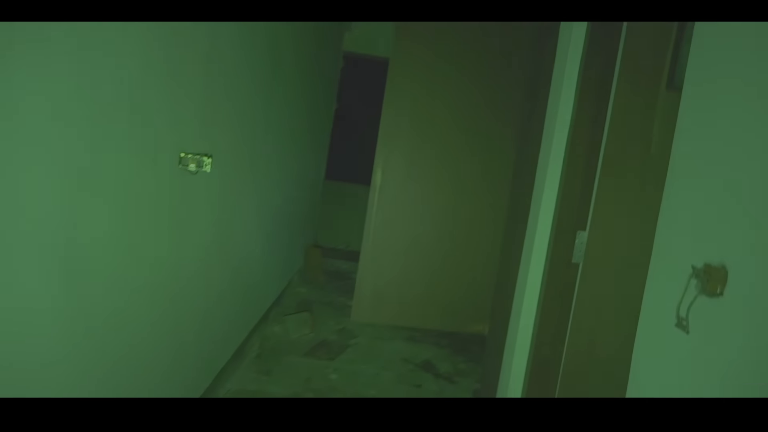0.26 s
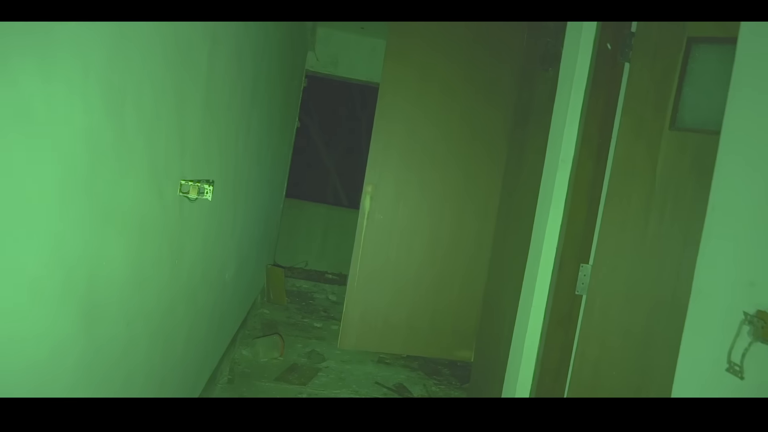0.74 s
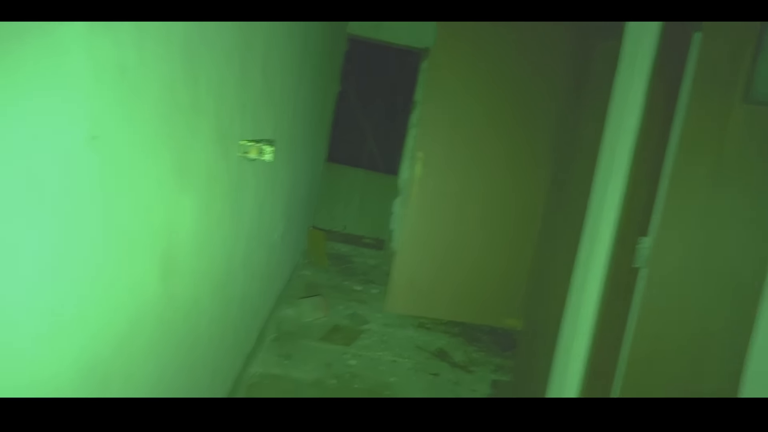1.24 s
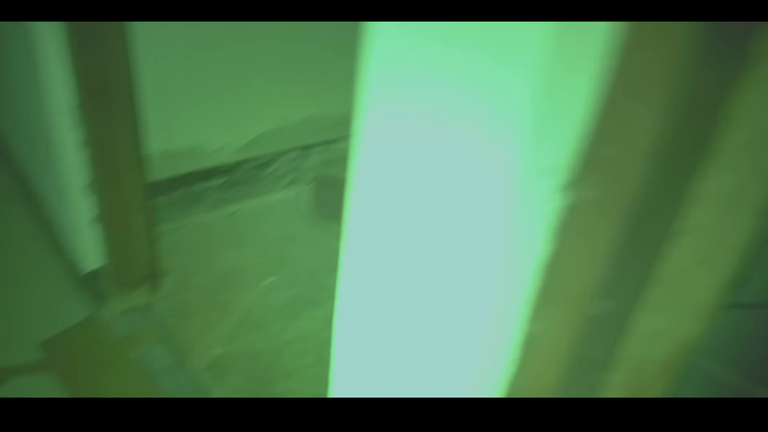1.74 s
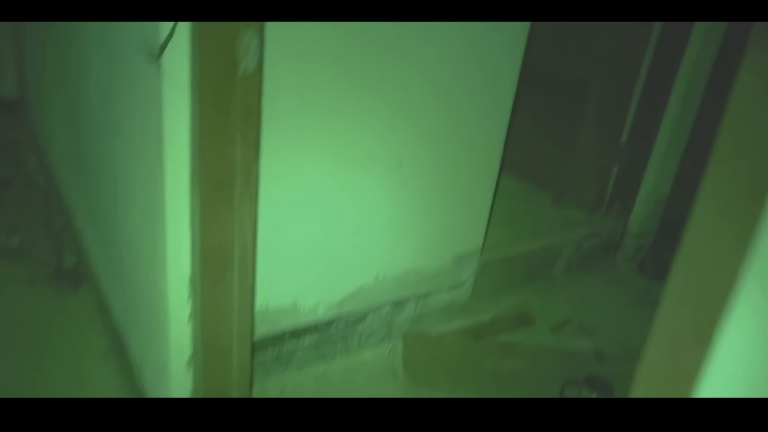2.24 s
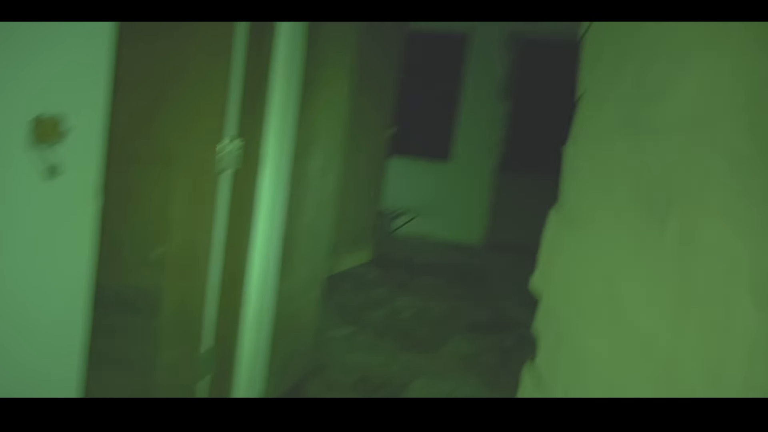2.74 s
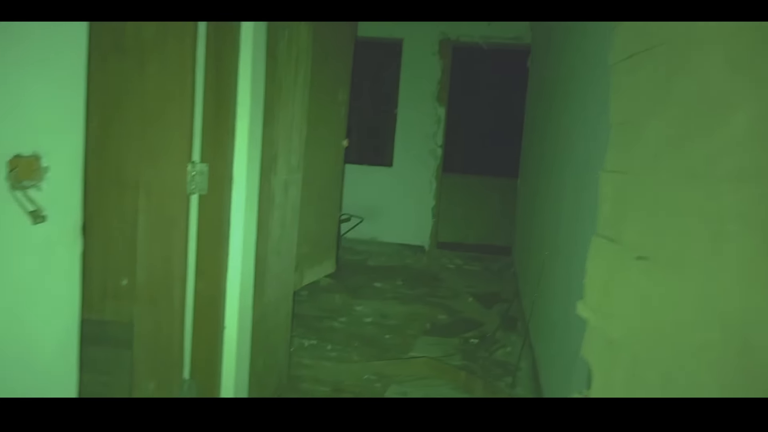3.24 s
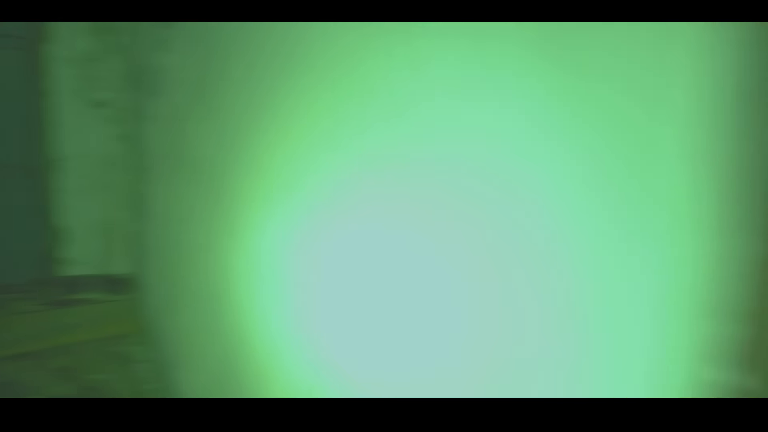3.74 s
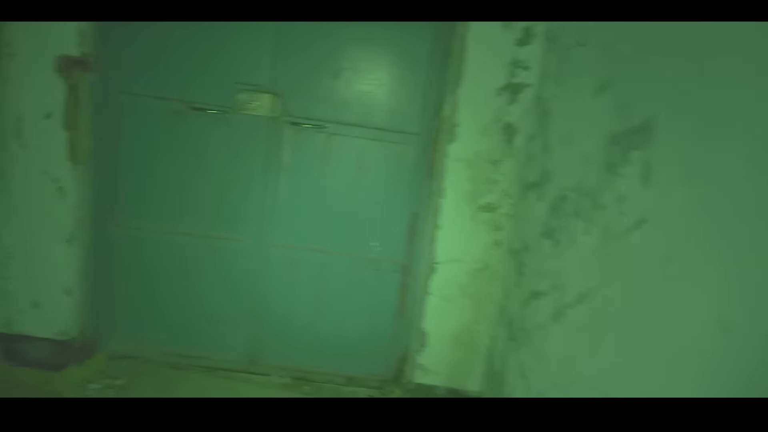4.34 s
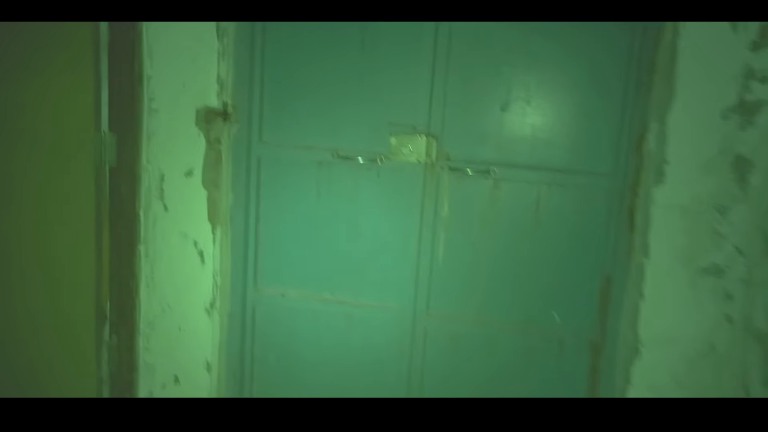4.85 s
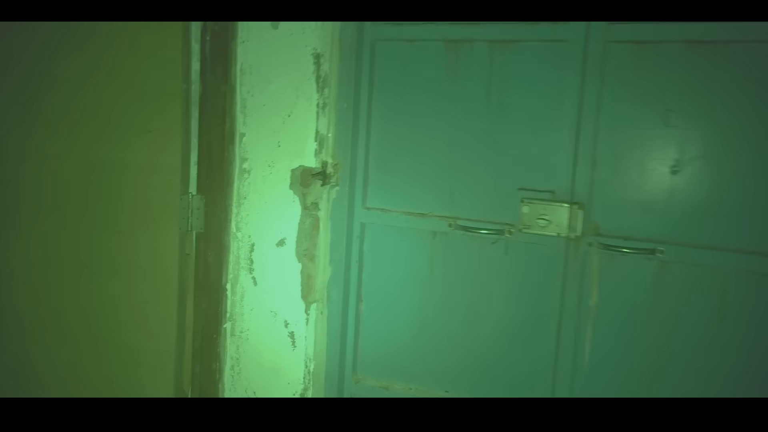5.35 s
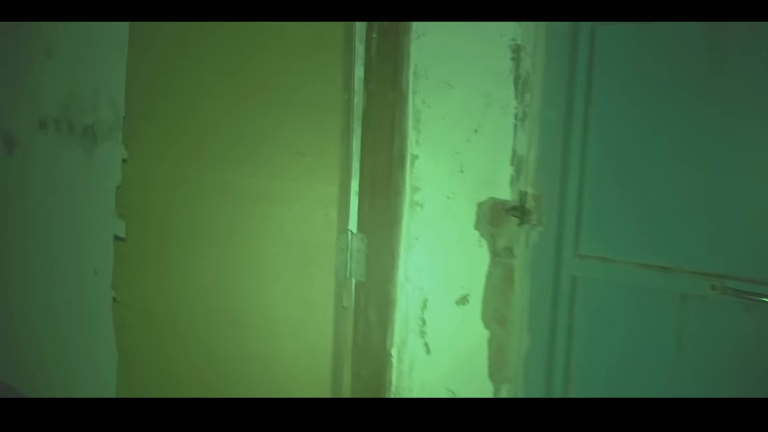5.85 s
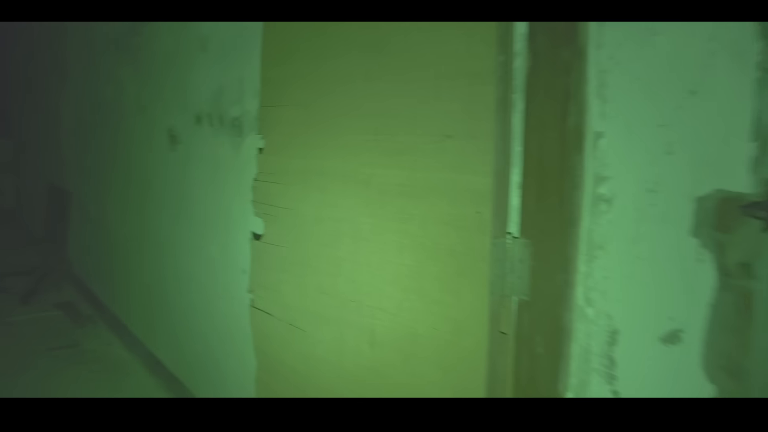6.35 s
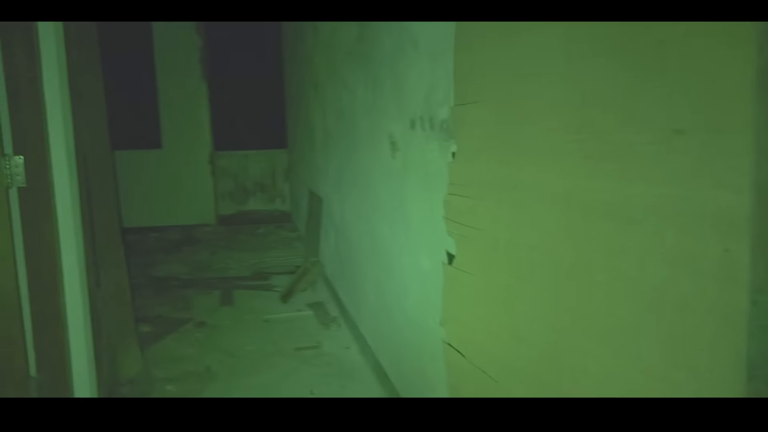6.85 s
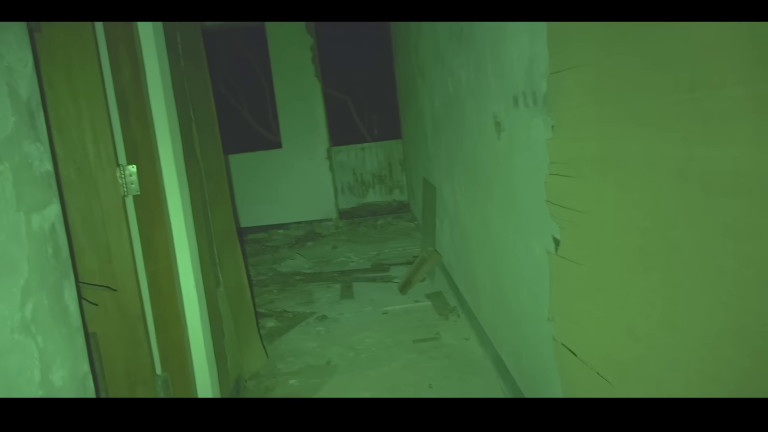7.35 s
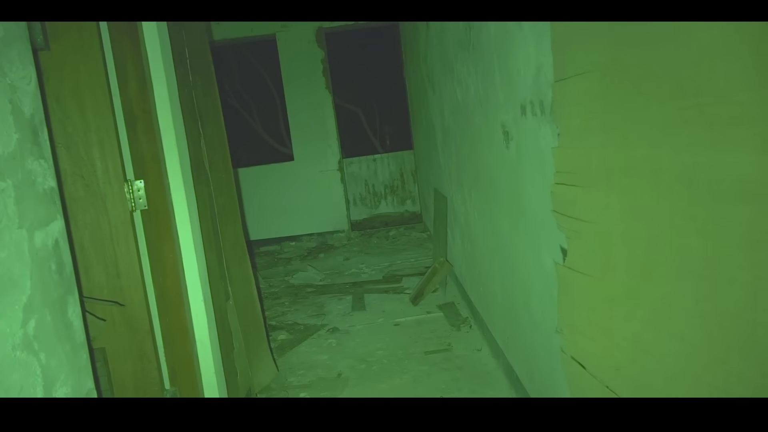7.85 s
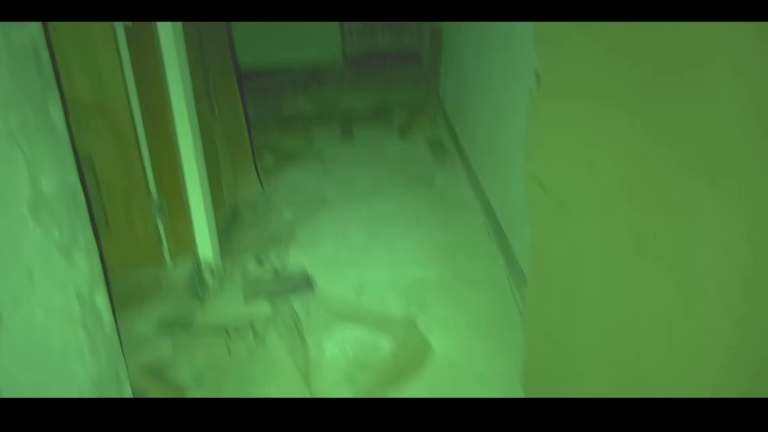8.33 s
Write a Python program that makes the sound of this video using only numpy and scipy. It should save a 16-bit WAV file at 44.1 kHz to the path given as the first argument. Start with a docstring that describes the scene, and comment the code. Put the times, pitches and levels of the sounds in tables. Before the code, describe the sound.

Someone steps slowly over broken plaster in bare, echoing rooms. Quiet scuffing comes first, then a dense run of brittle snaps and grinding grit with one very loud crack, then scattered lighter crunches. Night insects trill high and thin throughout, over low rumble and hiss, and soft low knocks shake the hand-held camera.

```python
"""Steps over rubble in an empty building

Slow steps cross plaster rubble and grit in an empty concrete building at night, heard from a hand-held camera.
Chips snap as short band-limited noise bursts, grit grinds as random grains, and the bare rooms echo both.
Dull jolts ring the camera body as damped modes, over low drones, air, hiss and a low tremble of the hand.
A high whine, most likely night insects, comes through the open windows as narrow bands of noise."""
import sys
import numpy as np
from scipy import signal
from scipy.fft import rfft, irfft, next_fast_len
from scipy.io import wavfile
from scipy.ndimage import uniform_filter1d

SR = 44100
rng = np.random.default_rng(int(sys.argv[2]) if len(sys.argv) > 2 else 0)


def log_audio(samples):
    """Write samples as a 16-bit WAV file to the path given in sys.argv[1]."""
    # one column per channel
    frames = np.atleast_2d(samples).T
    # limit to full scale, then quantise
    limited = np.clip(frames, -1, 1)
    pcm = np.round(limited * 32767).astype(np.int16)
    wavfile.write(sys.argv[1], SR, pcm)


N = 378827
T = np.arange(N) / SR

# a sole grinds or slides on grit: [t/s of greatest pressure, time scale of the rise t/s,
# level/dB before the mix, upper edge f/Hz]
GRINDS = [(0.362, 0.1, -58, 3500), (1.529, 0.13, -61, 2040), (1.95, 0.2, -62, 1900),
          (2.541, .25, -50, 1800), (2.69, 0.12, -43, 5000), (3.109, 0.059, -56.5, 2130),
          (3.499, .17, -63.5, 2192), (3.828, 0.038, -40, 4625), (3.931, 0.073, -39.5, 7800),
          (4.029, 0.043, -38.5, 6350), (4.289, 0.088, -50.5, 4280), (4.73, .014, -34.5, 4760),
          (4.808, .04, -32, 5960), (4.924, .044, -33, 5030), (5.047, 0.03, -34, 4800),
          (5.538, 0.017, -30, 5600), (5.589, 0.043, -41, 6670), (5.741, .058, -37.5, 6030),
          (6.6, .13, -50, 1820), (6.701, 0.11, -47.5, 8300)]


def undb(db):
    """Decibels to amplitude ratio: 20 dB is a factor of ten."""
    return 10 ** (np.asarray(db) / 20)


def unit(x):
    """Normalisation to a root-mean-square of 1."""
    return x / np.sqrt(np.mean(x ** 2) + 1e-20)


def on_log(points, hz):
    """Linear interpolation of (f/Hz, value) points on a logarithmic frequency axis."""
    f, value = np.transpose(points)
    return np.interp(np.log(np.maximum(hz, 1)), np.log(f), value)


def colour(x, points):
    """Zero-phase filtering: the spectrum is multiplied by the gain of (f/Hz, gain/dB) points."""
    size = next_fast_len(x.shape[-1], True)
    gain = undb(on_log(points, np.fft.rfftfreq(size, 1 / SR)))
    return irfft(rfft(x, size) * gain, size)[..., :x.shape[-1]]


def band(x, lo_hz, hi_hz, order=2):
    """Causal Butterworth band-pass, kept valid by a least width and a limit below half the sample rate."""
    hi_hz = min(max(hi_hz, 1.15 * lo_hz), .47 * SR)
    return signal.lfilter(*signal.butter(order, [lo_hz, hi_hz], "bandpass", fs=SR), x)


def stereo(pair, width):
    """Middle-side stereo: left is middle plus side, right is middle minus side."""
    return pair[0] + colour(pair[1], width) * np.array([[1], [-1]])


def walk(rate):
    """Random modulation: independent levels, rate per second, joined by straight ramps; spread near 1."""
    k = int(SR / rate)
    held = np.repeat(rng.standard_normal(N // k + 1), k)
    return 1.2 * uniform_filter1d(held, k)[:N]


def add(out, s, x):
    """Superposition: mix a sound in at time s."""
    i = max(int(s * SR), 0)
    out[..., i:i + x.shape[-1]] += x[..., :max(N - i, 0)]


def swell(s, spread_s, db):
    """Gaussian envelope: a gain that rises and fades once."""
    return undb(db) * np.exp(-((T - s) / spread_s) ** 2 / 2)


def trill(hz, width_hz):
    """Random-phase synthesis: one pitch blurred into a Gaussian band of noise, as middle and side."""
    size = next_fast_len(N, True)
    f = np.fft.rfftfreq(size, 1 / SR)
    near = np.abs(f - hz) < 5 * width_hz
    phase = 2 * np.pi * rng.random((2, len(f)))
    spectrum = np.zeros((2, len(f)), np.complex64)
    spectrum[:, near] = np.exp(1j * phase[:, near] - ((f[near] - hz) / (2 * width_hz)) ** 2)
    return unit(irfft(spectrum)[:, :N])


def background(tremble_db=1.0, unsteady_db=2, sway_hz=22, hiss_db=-59.49, rise_s=0.064, settle_s=.14):
    """Stationary noise and slow motion: air, drones, hiss, and a hand tremble that jumps at each swing."""
    # low murmur of the building: [t/s, level/dB]
    murmur_levels = [(0, -56), (.9, -61.5), (1.7, -56.5), (6.5, -55), (7.8, -60), (8.59, -54.5)]
    # spectra of the air and of the microphone hiss: [f/Hz, gain/dB]
    air_spectrum = [(30, 3), (60, -12), (100, -4.5), (150, -1.5), (250, -5), (400, -7), (650, -12),
                    (950, -11), (1400, -17.5), (2500, -20.5), (6000, -35.5)]
    hiss_spectrum = [(100, -1), (2000, 1.5), (6000, 6.5), (9000, 0), (16000, -2)]
    # low drones that come and go as the camera moves:
    # [loudest t/s, Gaussian spread t/s, centre f/Hz, width f/Hz, level/dB]
    drone_table = [(1.62, 0.16, 55, 20, -59), (2.08, 0.07, 193, 13, -55.5), (3.45, 0.028, 159, 36, -56.5),
                   (4.27, 0.036, 121, 31, -53.5), (7.3, 0.67, 105, 12, -60.5), (7.7, 0.74, 151, 21, -65.5)]
    # quick swings of the hand-held camera: [t/s, rumble level/dB before the channel gains]
    swing_table = [(1.57, -40.5), (2.02, -50), (2.45, -56), (3.72, -40), (8.38, -44)]

    murmur_db = np.interp(T, *np.transpose(murmur_levels))
    air = unit(colour(rng.standard_normal((2, N)), air_spectrum)) * undb(murmur_db + 0.41 * walk(14))
    drones = sum(trill(hz, width_hz) * swell(s, spread_s, db) for s, spread_s, hz, width_hz, db in drone_table)
    hiss = unit(colour(rng.standard_normal((2, N)), hiss_spectrum)) * undb(hiss_db)

    swings = np.zeros(N)
    for s, db in swing_table:
        swings += undb(db) * np.exp(-np.maximum((s - T) / rise_s, (T - s) / settle_s))
    tremble = undb(murmur_db + tremble_db + unsteady_db * walk(7))
    phase = 2 * np.pi * np.cumsum(sway_hz * (1 + 0.202 * walk(22))) / SR
    sway = np.sin(phase) * (tremble + swings)

    side_gain = ((100, -8), (300, -4), (700, -9), (2000, -9))  # [f/Hz, gain/dB]
    return stereo(air + drones, side_gain) + hiss + sway * np.array([[1.7], [.9]])


def insects(throb_db=0.82, drift_db=1.0, flutter_db=2.0, surge_s=.48, crest_s=7.89):
    """Amplitude-modulated noise bands: choruses flicker separately but surge together; some voices swell."""
    # choruses and single singers by name: [centre f/Hz, width f/Hz]
    pitches = {"low": (3250, 130), "middle": (4600, 235), "upper": (5520, 220), "high": (6650, 220),
               "top": (7620, 220), "overtone": (9750, 450), "a": (4480, 80), "b": (4765, 35),
               "c": (5370, 35), "d": (5670, 12), "e": (5970, 25), "f": (6820, 40), "g": (7850, 100)}
    # common level curve, louder towards the open windows: [t/s, level/dB before each chorus's share]
    night_levels = [(0, 1), (.55, -2.5), (1.05, 2.9), (1.42, -2.5), (1.87, 1), (2.1, -10.5), (2.4, -0.5),
                    (3, -0.5), (3.55, 1.5), (3.9, -8), (5.95, -7), (6.3, -2), (7, -4.5), (8.59, -3.5)]
    # choruses: [pitch name, level/dB, share of the level curve, surge amplitude/dB]
    choruses = [("low", -54.5, 1.05, 1.5), ("middle", -68, 0.64, .3), ("top", -61, 0.23, .3),
                ("high", -67.5, .3, .3), ("upper", -70, .1, .3), ("overtone", -74, 0.97, .3)]
    # single singers and whole choruses that swell for a while:
    # [pitch name, loudest t/s, Gaussian spread t/s, level/dB]
    swelling_voices = [("middle", 1.4, 0.48, -63), ("middle", 5.1, 1.7, -61), ("a", 1.26, .06, -59.5),
                       ("a", 2.96, 0.5, -61.5), ("b", 1.75, 0.91, -64), ("b", 3.3, 0.31, -55.5),
                       ("b", 5.25, 0.7, -61), ("g", 1.38, 0.34, -57), ("f", 2.6, 1.6, -70),
                       ("g", 5.95, 0.29, -63), ("c", 7.05, 0.13, -63), ("upper", 7.7, .89, -64.5),
                       ("e", 7.75, 0.088, -61.5), ("d", 8.08, .11, -55.5), ("c", 8.5, 0.11, -63)]

    out = np.zeros((2, N))
    night_db = np.interp(T, *np.transpose(night_levels))
    surge = np.cos(2 * np.pi * (T - crest_s) / surge_s)
    for pitch, db, share, surge_db in choruses:
        unsteady_db = throb_db * walk(45) + drift_db * walk(5)
        out += trill(*pitches[pitch]) * undb(db + share * night_db + surge_db * surge + unsteady_db)
    for pitch, s, spread_s, db in swelling_voices:
        out += trill(*pitches[pitch]) * swell(s, spread_s, db + flutter_db * walk(14))
    side_gain = ((3200, -12), (4700, -12), (5600, -7), (7600, -8), (10000, -4))  # [f/Hz, gain/dB]
    return stereo(out, side_gain)


def jolts(push_s=0.0032, rattle_db=-13, detune=0.047, pan_db=-2.2):
    """Damped modes: soft blows ring the camera body, whose rocking sets the two microphones out of phase."""
    # jolts of heel and hand: [t/s, lowest mode level/dB, upper modes level/dB]
    blows = [(1.80, -47, -66), (1.998, -50, -56), (2.554, -53, -37.5), (3.743, -36.5, -31),
             (4.235, -45.5, -47), (4.30, -49, -47), (4.727, -55, -35), (4.819, -35.5, -25),
             (5.055, -41, -30.5), (5.276, -48, -34), (5.531, -50, -31.5), (6.876, -42.5, -27.5),
             (8.348, -29.5, -42), (8.478, -39.5, -28)]
    # modes of the camera body: [f/Hz before detuning, 60 dB decay t/s, relative level/dB, side to middle level/dB]
    modes = [(181.3, 0.15, 2.5, -9), (346, 0.065, 0, -4), (464.5, 0.06, -5, -23)]

    out, t = np.zeros((2, N)), T[:SR // 3]
    for s, low_db, upper_db in blows:
        for k, (hz, t60, db, side_db) in enumerate(modes):
            phase = 2 * np.pi * hz * (1 + detune * rng.standard_normal()) * t
            rattle = undb(rattle_db) * unit(band(rng.standard_normal((2, len(t))), .6 * hz, 1.4 * hz))
            middle = np.sin(phase) + rattle[0]
            side = undb(side_db) * (np.cos(phase) + rattle[1])  # a quarter period from the middle
            ring = middle + side * np.array([[1], [-1]])
            envelope = np.exp(-np.log(1000) * t / t60) * (1 - np.exp(-t / push_s))
            add(out, s, undb(db + (upper_db if k else low_db)) * ring * envelope)
    return out * undb(np.array([[pan_db], [-pan_db]]) / 2)


def scuffs(grain_rate=2200, spread_db=6.0, slide_db=-7, fall_share=0.95):
    """Granular friction: grains burst under the sole's rising and falling pressure, over the rub of dust."""
    out = np.zeros((2, N))
    for s, rise_s, db, hi_hz in GRINDS:
        start = max(s - .5, 0)
        t = T[:SR] + start - s
        bursts = rng.random(SR) < grain_rate / SR
        sizes = bursts * undb(spread_db * rng.exponential(size=SR).clip(0, 4))
        grains = unit(sizes * rng.choice([-1, 1], (2, SR)))
        grit = grains + undb(slide_db) * rng.standard_normal((2, SR))
        # brighter grit has a higher lower edge too
        lo_hz = 790 * (hi_hz / 3060) ** 0.16
        pressure = np.exp(-np.abs(t / np.where(t < 0, rise_s, fall_share * rise_s)) ** 1.9)
        add(out, start, undb(db) * pressure * unit(band(grit, lo_hz, hi_hz)))
    return out


def small_chips(per_s=42, most=24, gain_db=4.5, spread_db=2, pitch_share=0.56, spread_octaves=0.39):
    """Random fracture under load: chips cluster about each pressure peak; rows of (t/s, level/dB, f/Hz)."""
    rows = []
    for s, rise_s, db, hi_hz in GRINDS:
        count = round(2 * rise_s * per_s)
        when, size, pitch = rng.standard_normal((most, 3))[:count].T
        times = s + rise_s * when / 2
        levels = db + gain_db + spread_db * size
        pitches = pitch_share * hi_hz * 2 ** (spread_octaves * pitch)
        rows += zip(times, levels, pitches)
    return rows


def chip(x, lo_hz, hi_hz, floor_db):
    """Two resonance bands: a chip sounds in its own band and knocks more weakly on the floor, lower down."""
    return band(x, lo_hz, hi_hz) + undb(floor_db) * band(x, lo_hz / 5, lo_hz / 1.88)


def cracks(table, snap_s=0.00059, crumble_s=0.011, crumb_db=-18, crumb_spread_db=5, floor_db=-13,
           octaves=1.58, top_hz=10690):
    """Brittle fracture: each chip gives one sharp snap, then its crumbs die away over some milliseconds."""
    out, t = np.zeros((2, N)), T[:SR // 20]
    half_band = 2 ** (octaves / 2)
    for s, db, hz in table:
        lo_hz, hi_hz = min(hz / half_band, top_hz / 2), min(hz * half_band, top_hz)
        snap = chip(rng.standard_normal((2, len(t))) * np.exp(-t / snap_s), lo_hz, hi_hz, floor_db)
        # the level is the snap's energy spread over one millisecond
        snap = snap / np.sqrt(np.sum(snap ** 2, axis=1, keepdims=True) * 1000 / SR)
        sizes = undb(crumb_spread_db * rng.exponential(size=len(t)).clip(0, 4))
        crumbs = chip(rng.standard_normal((2, len(t))) * sizes, lo_hz, hi_hz, floor_db)
        crumbs = unit(crumbs) * np.exp(-t / crumble_s)
        add(out, s, undb(db) * (snap + undb(crumb_db) * crumbs))
    return out


def room(pair, early_db=-3, early_s=0.011, late_db=-4, gap_s=0.00037):
    """Reverberation: near walls answer at once, rooms beyond ring on; echoes change as the walker moves."""
    # ring of the bare rooms: [f/Hz, 60 dB decay t/s]
    ring_times = [(300, 0.4), (1500, 0.46), (3500, 0.44), (7000, 0.43), (9500, 0.36), (15000, 0.22)]

    t, hop = T[:SR * 3 // 5], SR // 10
    size = next_fast_len(N + len(t), True)
    hz, t60 = np.transpose(ring_times)
    noise, f = rfft(rng.standard_normal((2, size))), np.fft.rfftfreq(size, 1 / SR)
    # overlapping bands of one noise, each dying at its own pace
    bands = np.array([irfft(noise * on_log(np.c_[hz, share], f)) for share in np.eye(len(hz))], np.float32)
    decay = np.exp(-np.log(1000) * t / t60[:, None]).astype(np.float32)
    build = 1 - np.exp(-(t / gap_s) ** 2)
    near = build * np.exp(-t / early_s)
    reflections = rng.standard_normal((2, size)) * np.abs(rng.standard_normal(size))

    out, window = pair.copy(), signal.get_window("hann", 2 * hop)
    # overlapping pieces of sound, each with an echo from a later stretch of the noise
    for i in range(0, N - hop, hop):
        early = unit(near * reflections[:, i:i + len(t)])
        late = unit(build * np.einsum("bct,bt->ct", bands[..., i:i + len(t)], decay))
        echo = (undb(early_db) * early + undb(late_db) * late) / np.sqrt(len(t))
        piece = pair[:, i:i + 2 * hop] * window[:N - i]
        add(out, i / SR, signal.fftconvolve(piece, echo, axes=1))
    return out


def scene(crack_db=-3, scuff_db=-3):
    """Superposition of sources: steps in the echoing rooms, with the night behind them."""
    # the loudest chips that snap or are kicked: [t/s, level/dB before the mix, centre f/Hz]
    loud_chips = [(.257, -43, 2400), (.352, -44, 2100), (1.06, -48, 1300), (1.544, -46, 1600),
                  (1.655, -42, 1460), (2.650, -24.5, 1490), (2.657, -35, 2720), (2.976, -40, 1870),
                  (3.09, -40, 1830), (3.163, -41, 700), (3.806, -28, 1558), (3.8935, -32, 3500),
                  (3.9247, -23.5, 3060), (4.0065, -22, 2260), (4.0178, -19, 9900), (4.1074, -35.5, 6050),
                  (4.211, -38.5, 1700), (4.3048, -27, 3020), (4.5253, -23.5, 2350), (4.533, -22, 3250),
                  (4.7165, -27.5, 1494), (4.7905, -27, 3470), (4.806, -20.5, 2000), (4.8136, -24, 3046),
                  (4.8914, -25.5, 2696), (4.8991, -20.5, 3160), (4.9125, -20, 1460), (4.9392, -21.5, 5010),
                  (4.9467, -23.5, 6600), (5.0134, -21, 2780), (5.0346, -19, 4170), (5.0533, -8.5, 1800),
                  (5.0606, -7.5, 3425), (5.064, -12.5, 2640), (5.2145, -34, 1900), (5.4018, -33.5, 4940),
                  (5.4085, -29, 4750), (5.4806, -30.5, 4800), (5.4871, -28, 4680), (5.527, -25.5, 1400),
                  (5.531, -17, 4005), (5.6184, -28.5, 3040), (5.7161, -30, 3300), (5.7331, -17.5, 3270),
                  (5.797, -31, 5460), (5.905, -33.5, 2040), (6.2597, -31.5, 3000), (6.3075, -32, 3000),
                  (6.3095, -26.5, 4340), (6.3776, -34.5, 5800), (6.4321, -26, 4266), (6.5501, -31.5, 4250),
                  (6.556, -31.5, 1050), (6.6072, -23.5, 5250), (6.6121, -33, 5010), (6.685, -33, 3620),
                  (6.7266, -33, 5130), (6.749, -32, 3210), (6.8006, -39.5, 5520), (7.68, -48.5, 1463),
                  (8.347, -42, 1600)]
    # spectrum of broken plaster: [f/Hz, gain/dB]
    plaster = [(100, -20), (280, 9.5), (520, 3), (900, 4.5), (2600, 0.5), (3900, -2), (5300, 1),
               (9000, -0.5), (16000, -2)]
    # side against middle for two close microphones: [f/Hz, gain/dB]
    side_gain = [(30, -7), (130, -8), (280, -37), (550, -22), (1200, -28), (2200, -13.5), (4000, -5.5),
                 (6000, -4), (9000, 0), (14000, 1.5)]

    behind = background() + insects() + jolts()
    snaps = cracks(loud_chips) + cracks(small_chips())
    rubble = undb(scuff_db) * scuffs() + undb(crack_db) * snaps
    return stereo(room(colour(rubble, plaster)), side_gain) + behind


def record(dry, fade_from_db=-10, fade_s=1.41, top_hz=15900):
    """Saturation and low-pass: the level fades up, loudest snaps are rounded, the top treble is cut."""
    fade = np.interp(T, [0, fade_s], [undb(fade_from_db), 1])
    rounded = .8 * np.tanh(fade * dry / .8)
    return signal.sosfilt(signal.ellip(10, .1, 70, top_hz, fs=SR, output="sos"), rounded)


dry = scene()
out = record(dry)
log_audio(out)
```